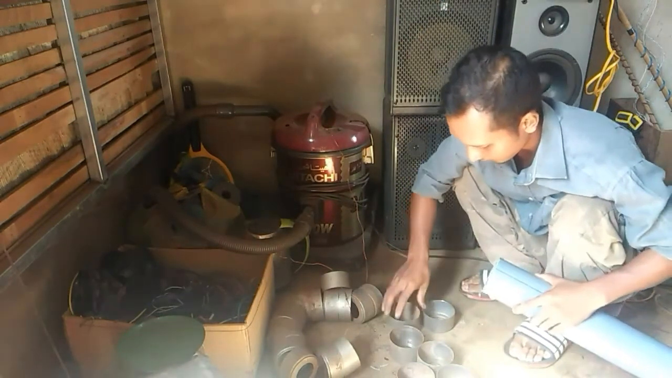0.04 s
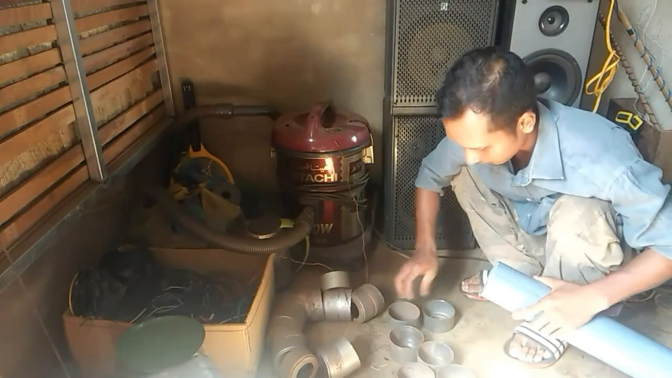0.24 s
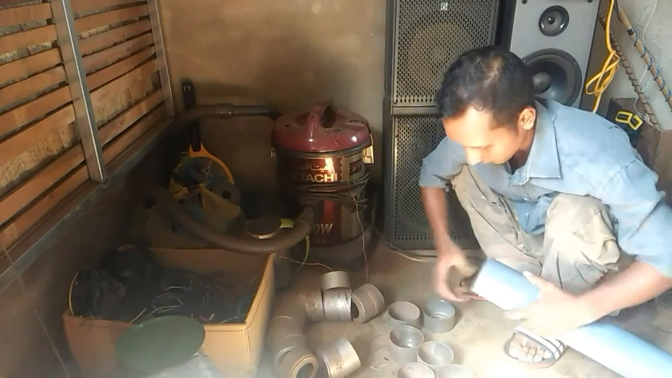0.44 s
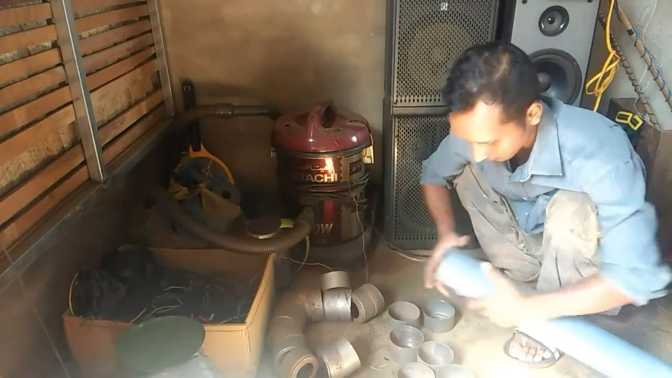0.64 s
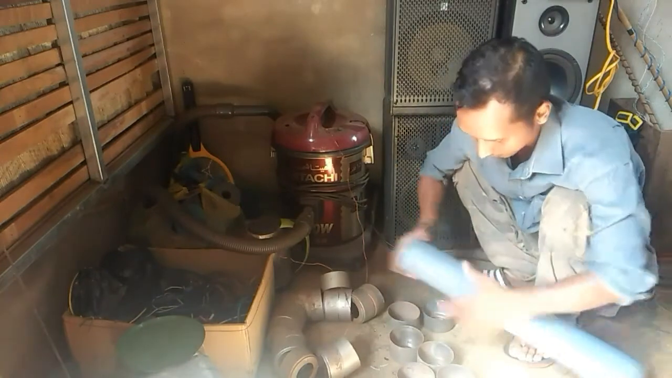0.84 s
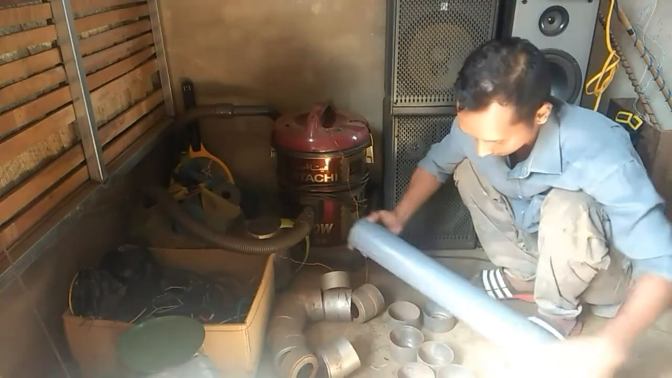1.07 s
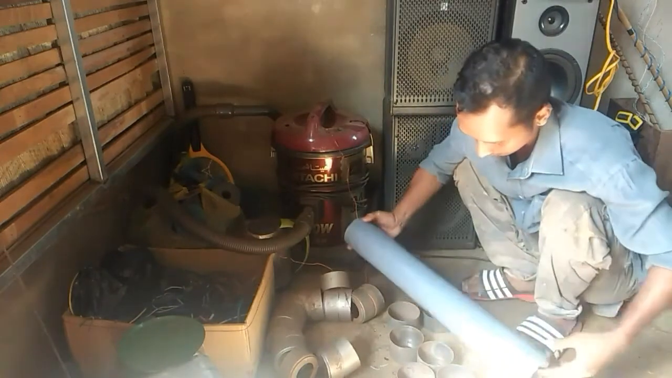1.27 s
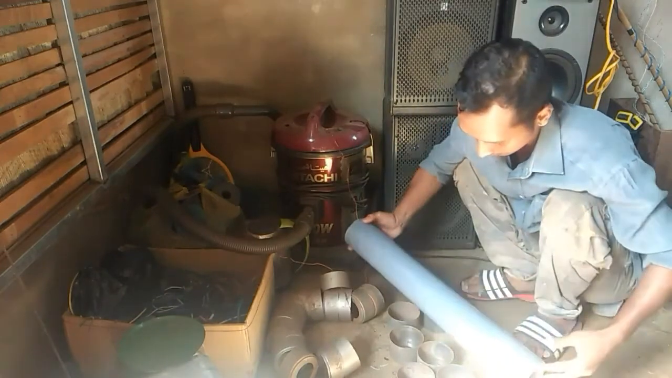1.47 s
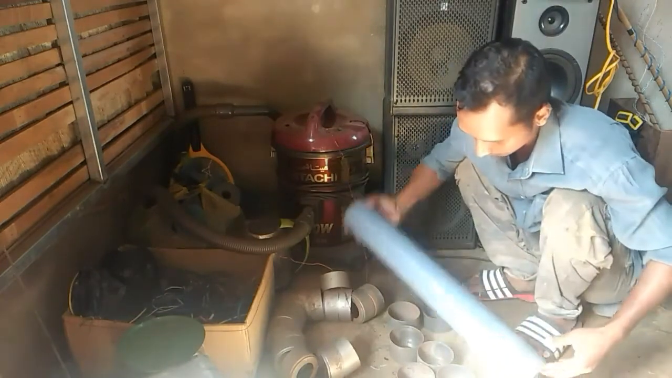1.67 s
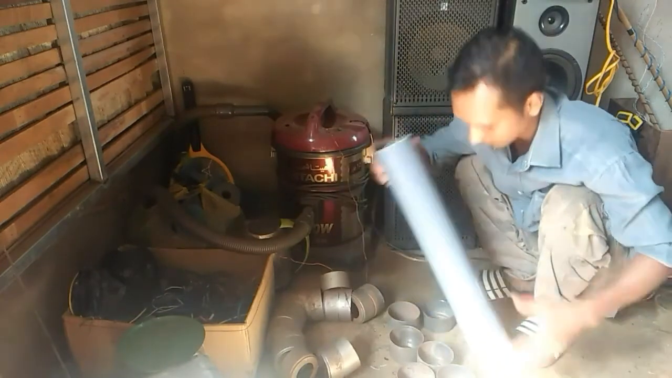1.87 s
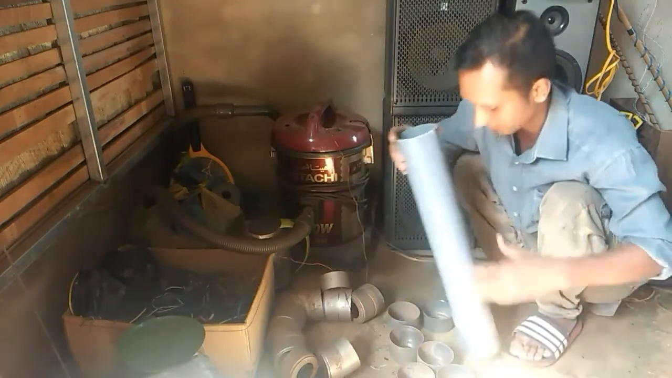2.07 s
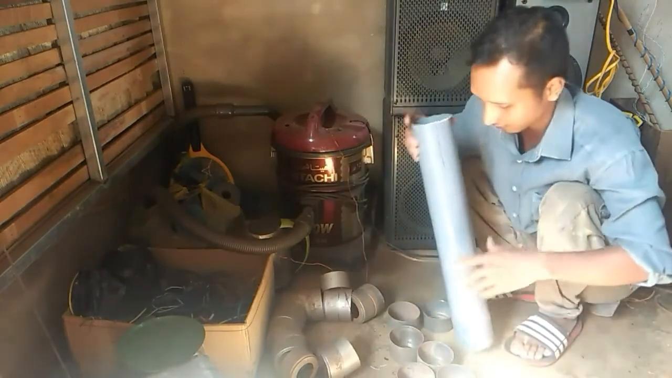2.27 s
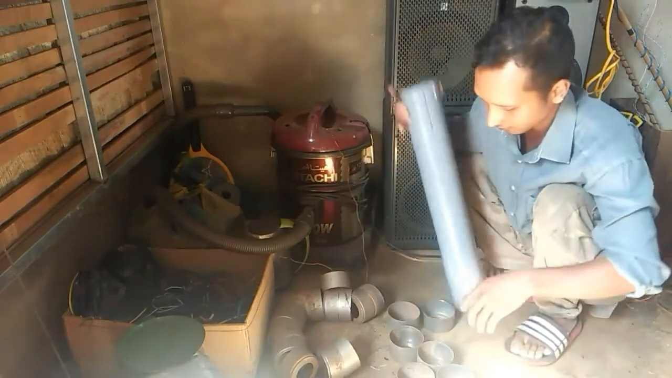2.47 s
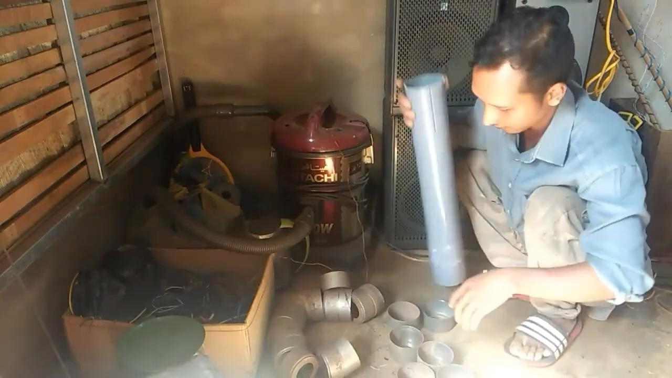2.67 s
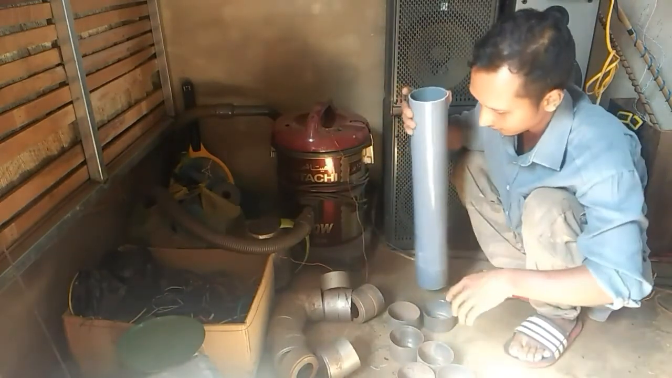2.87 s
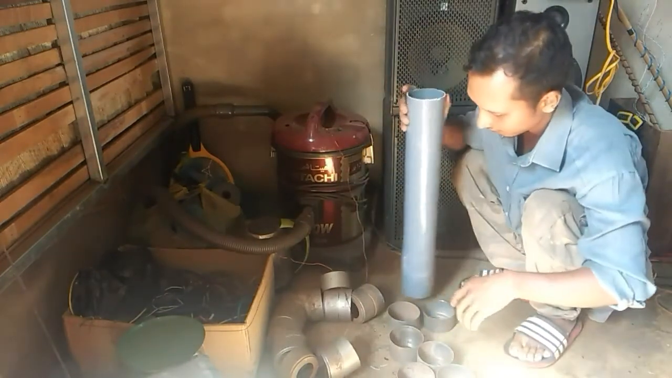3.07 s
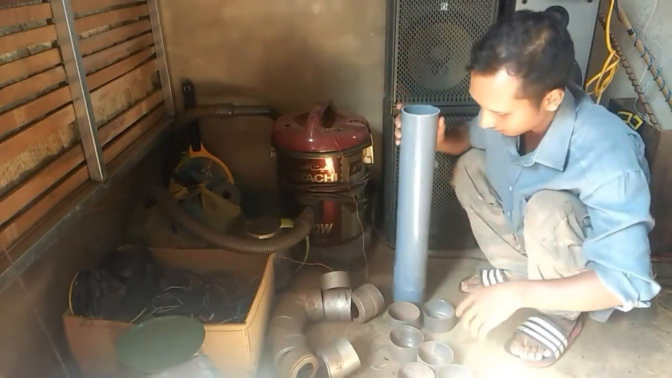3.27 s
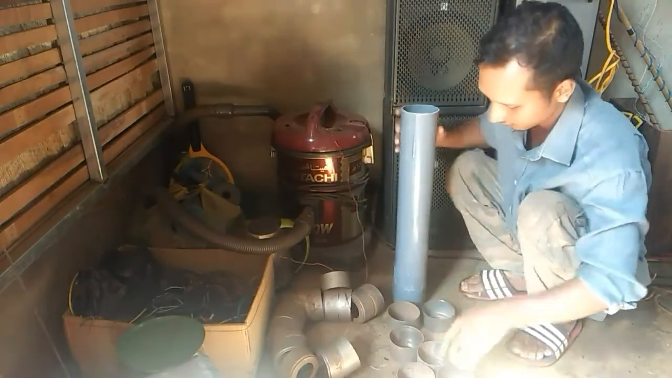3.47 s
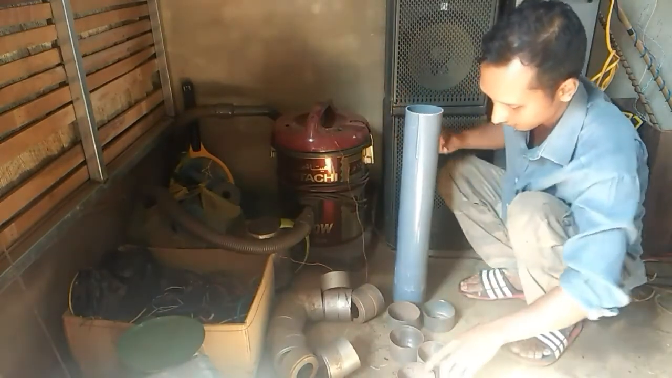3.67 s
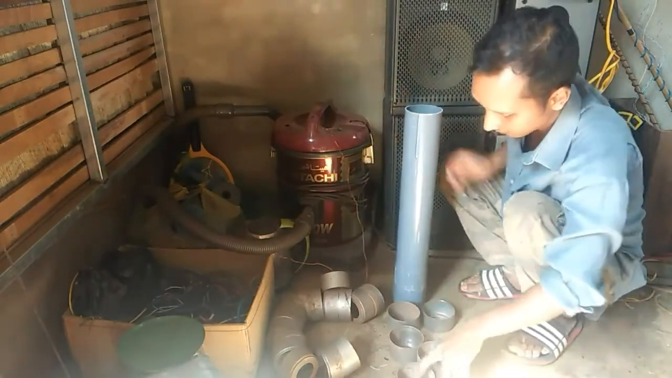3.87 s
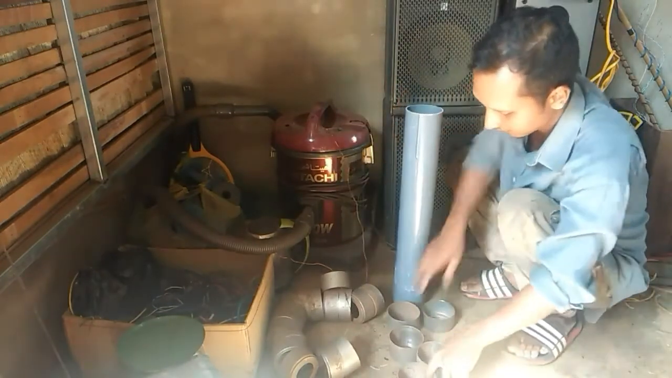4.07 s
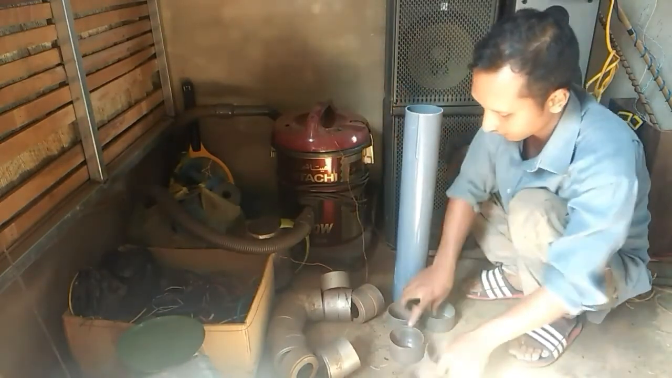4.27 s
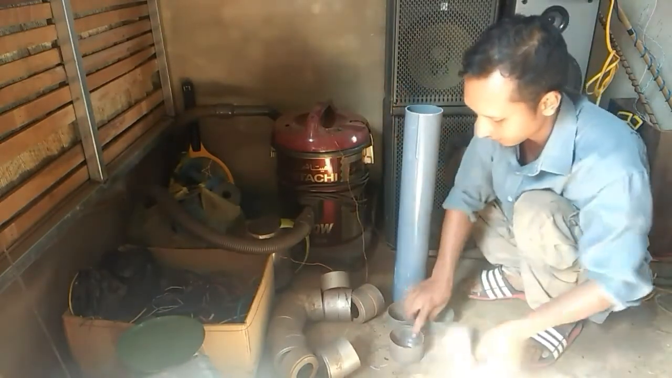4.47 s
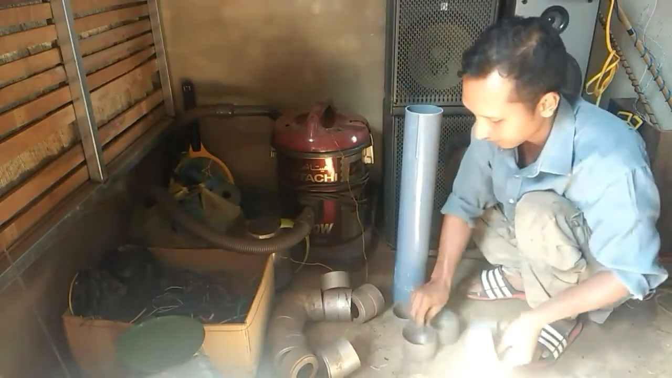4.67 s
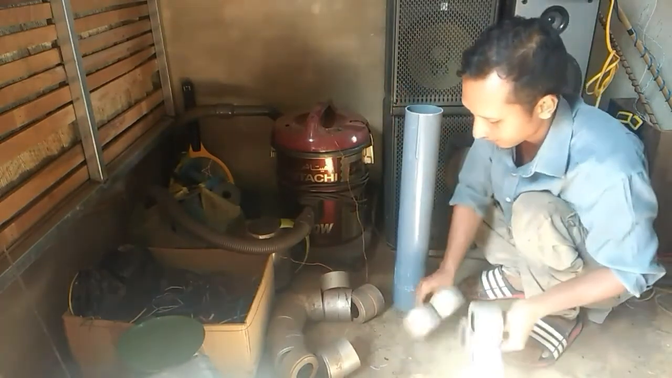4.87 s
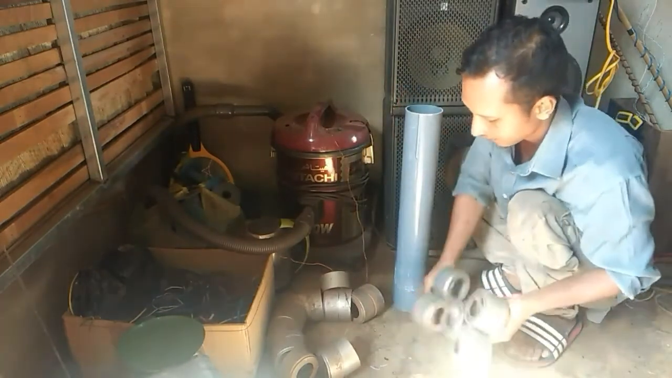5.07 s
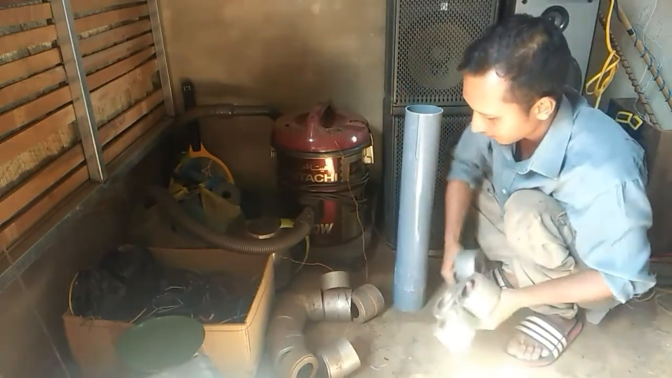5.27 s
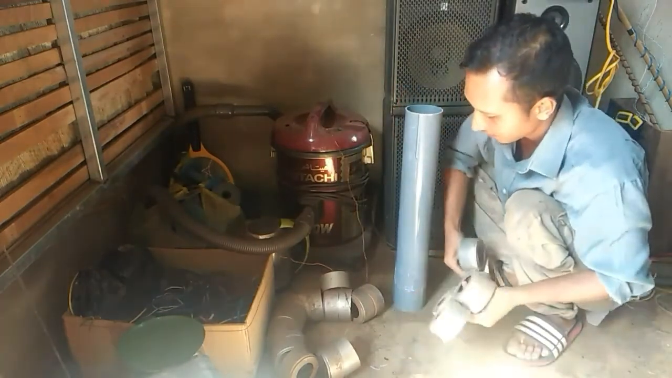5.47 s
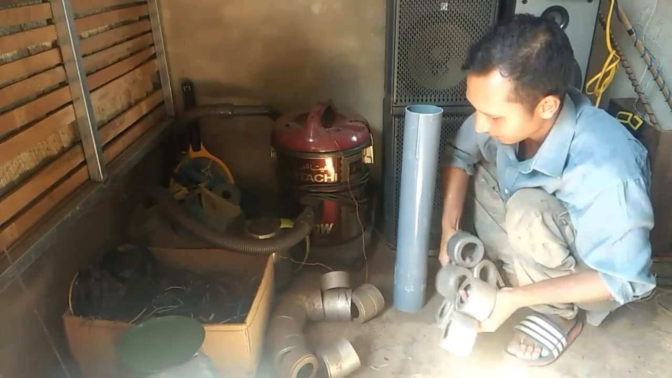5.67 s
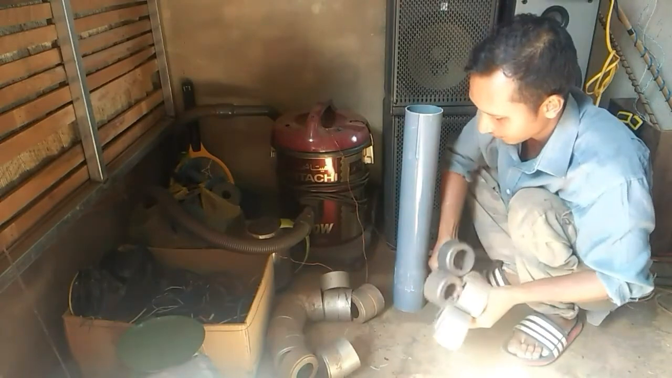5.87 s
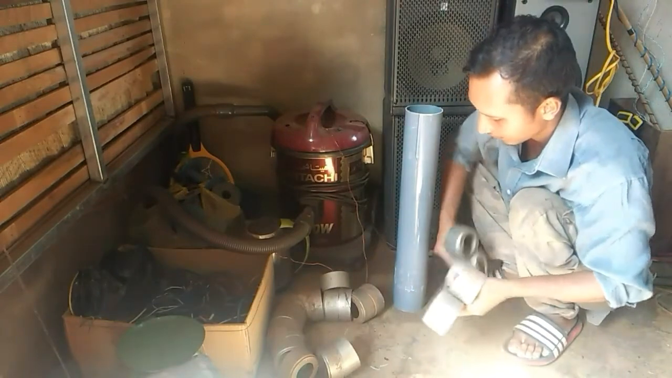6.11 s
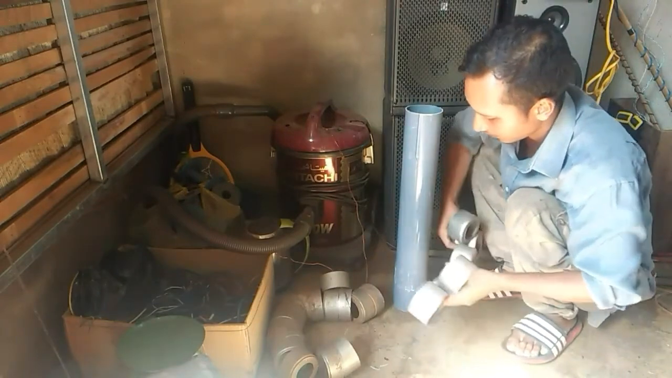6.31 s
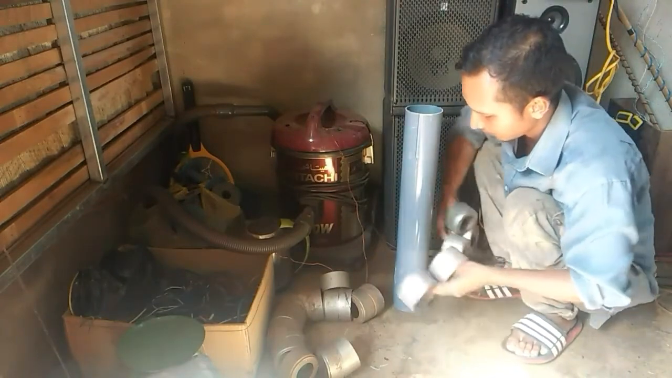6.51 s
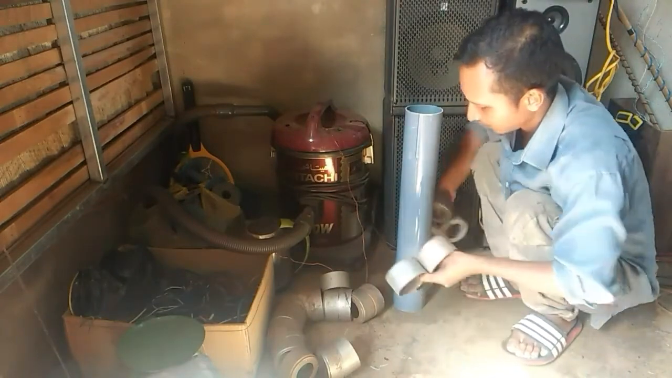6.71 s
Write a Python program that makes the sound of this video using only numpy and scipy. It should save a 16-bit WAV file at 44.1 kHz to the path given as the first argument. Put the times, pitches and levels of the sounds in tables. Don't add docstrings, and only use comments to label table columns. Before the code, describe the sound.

Small metal tube pieces clink and scrape in a plastic pipe, the pipe knocks hollowly on concrete, then the pieces clatter together in the hands.

```python
import sys
import numpy as np
from scipy import signal
from scipy.fft import rfft, irfft, next_fast_len
from scipy.io import wavfile
from scipy.ndimage import uniform_filter1d

SR = 44100
rng = np.random.default_rng(int(sys.argv[2]) if len(sys.argv) > 2 else 0)


def ratio_of_db(decibels):
    return 10 ** (np.asarray(decibels, float) / 20)


def int16_out(signal):
    q = np.round(np.clip(np.atleast_2d(signal).T, -1, 1) * 32767)
    wavfile.write(sys.argv[1], SR, q.astype(np.int16))


N = 297436

# start_s, level_db, hardness_db
PIPE_KNOCKS = [
    (3.289, -13.5, -17.5),
    (3.2965, -8.5, 2.5),
    (3.31, -21, -15.5),
    (3.332, -15.5, -4),
    (3.347, -14, -13.5),
    (3.51, -43, -21.5),
]


def rms_one(x):
    return x / np.sqrt(np.mean(x ** 2) + 1e-20)


def filtered(x, order, edge_hz, kind):
    return signal.sosfilt(signal.butter(order, edge_hz, kind, fs=SR, output="sos"), x)


def in_time(rows, outside=None):
    s, *columns = np.transpose(rows)
    return [np.interp(np.arange(N) / SR, s, c, outside, outside) for c in columns]


def coloured(x, spectrum):
    size = next_fast_len(len(x))
    hz, db = np.transpose(spectrum)
    bin_hz = np.maximum(np.fft.rfftfreq(size, 1 / SR), 1)
    bin_db = np.interp(np.log(bin_hz), np.log(hz), np.maximum(db, -80))
    cepstrum = irfft(np.log(ratio_of_db(bin_db)), size)
    cepstrum[1:size // 2] *= 2
    cepstrum[size // 2 + 1:] = 0
    response = np.exp(rfft(cepstrum))
    return rms_one(irfft(rfft(x, size) * response, size)[:len(x)])


def drift(rate_hz):
    knots = rng.standard_normal(2000)
    return np.interp(np.arange(N) / SR * rate_hz, np.arange(len(knots)), knots)


def grit(per_s, spread_db, smooth, size=N):
    heights = ratio_of_db(spread_db * np.minimum(rng.exponential(1, size), 4))
    signed = heights * rng.choice([-1, 1], size)
    contacts = signed * (rng.random(size) < per_s / SR)
    return rms_one(contacts) + smooth * rng.standard_normal(size)


def ring(drive, hz, t60_s):
    r = ratio_of_db(-60 / (max(t60_s, .01) * SR))
    w = 2 * np.pi * hz / SR
    return signal.lfilter([0, np.sin(w)], [1, -2 * r * np.cos(w), r * r], drive + 1e-18)


def strike(modes, times_s, levels_db, spread_db, chatter_s, chatter_db, flutter_db):
    at = np.round(np.array(times_s) * SR).astype(int)
    out = np.zeros(N)
    luck = rng.standard_normal((len(at), len(modes)))
    span = slice(at.min(), min(at.max() + SR // 2, N))
    fade = np.exp(-1 / (chatter_s * SR))
    rough = rms_one(grit(900, 3.5, 0.31, size=span.stop - span.start))
    contacts = ratio_of_db(chatter_db) * np.sqrt(1 - fade) * rough
    for k, (hz, db, t60_s) in enumerate(modes):
        clicks = np.zeros(len(contacts))
        clicks[at - at.min()] = ratio_of_db(levels_db + db + spread_db * luck[:, k])
        swell = signal.lfilter([2 * (1 - fade)], [1, -2 * fade, fade ** 2], clicks + 1e-18)
        drive = clicks + contacts * swell
        knots = ratio_of_db(flutter_db * rng.standard_normal(600))
        flutter = np.interp(np.arange(len(drive)) * 70.0 / SR, np.arange(600), knots)
        sound = ring(drive, hz, t60_s) * flutter
        energy = np.sum(clicks ** 2) * (1 + ratio_of_db(chatter_db) ** 2 / 2) * t60_s * SR / (4 * np.log(1000))
        out[span] += sound * np.sqrt(energy / np.sum(sound ** 2))
    return out


def glances(touches):
    out, size = np.zeros(N + SR), SR // 2
    t = np.arange(size) / SR
    for s, hz, db, t60_s in touches:
        chatter_env = t / .012 * np.exp(-t / min(.012, t60_s / 5)) * .05
        drive = grit(900, 2.7, .6, size=size) * chatter_env
        drive[0] = 1
        knots = ratio_of_db(3.5 * rng.standard_normal(size // 100))
        flutter = np.interp(t * 70, np.arange(size // 100), knots)
        sound = ring(drive, hz, t60_s) * flutter
        energy = .65 * max(t60_s, .01) * SR / (4 * np.log(1000))
        i = round(s * SR)
        out[i:i + size] += ratio_of_db(db) * sound * np.sqrt(energy / np.sum(sound ** 2))
    return out[:N]


def bursts(times_s, levels_db, t60s_s, rises_s):
    out = np.zeros(N)
    for s, db, t60_s, rise_s in np.broadcast(times_s, levels_db, t60s_s, rises_s):
        i = round(s * SR)
        t = np.arange(min(SR // 2, N - i)) / SR
        rise = 1 - np.exp(-t / max(rise_s, 1e-4))
        out[i:i + len(t)] += ratio_of_db(db - 60 * t / max(t60_s, .005)) * rise
    return out


def echo(x, t60_s, gap_s):
    t = np.arange(SR // 2) / SR
    tail = rng.standard_normal(len(t)) * ratio_of_db(-60 * t / t60_s) * (t > gap_s)
    return signal.fftconvolve(x, tail / np.sqrt(np.sum(tail ** 2)))[:N]


def streaky(x, t60_s):
    turn = 1.3 * drift(9)
    return rms_one(.5 * x + np.cos(turn) * echo(x, t60_s, 0) + np.sin(turn) * echo(x, t60_s, 0))


def swells():
    # start_s, length_s, deep_db, low_db
    rumble_swells = [
        (0.0, 0.15, -71, -64),
        (0.354, 1, -71, -61.5),
        (1.85, 0.17, -69, -67),
        (2.19, 2.5, -71.5, -76),
        (3.309, 3.7, -67.5, -69),
        (4.712, 0.19, -59, -63),
        (5.295, 0.13, -50.5, -52),
        (5.62, 0.28, -59.5, -62.5),
        (6.148, 0.53, -59.5, -82),
    ]
    edge_s, floor_db = 0.17, -81.5
    t, power = np.arange(N) / SR, ratio_of_db(2 * floor_db)
    for s, length_s, *levels_db in rumble_swells:
        shape = np.clip(np.minimum(t - s, s + length_s - t) / edge_s + .5, 0, 1) ** 2
        power = power + np.outer(ratio_of_db(2 * np.array(levels_db)), shape)
    return 10 * np.log10(power)


def rumble(levels_db):
    # from_hz, to_hz
    bands_hz = [(36, 55), (60, 110)]
    bands = [filtered(rng.standard_normal(N), 3, edges_hz, "band") for edges_hz in bands_hz]
    return sum(ratio_of_db(db + 2.0 * drift(15)) * rms_one(band) for db, band in zip(levels_db, bands))


def air_noise():
    # hz, db_per_hz
    air_spectrum = [(53, -24), (90, -1.5), (374, -22.5), (425, -11), (585, -16.5), (708, -8), (933, -11.5),
                    (1880, -22.5), (3140, -30.5), (14500, -36)]
    return ratio_of_db(-75 + 0.73 * drift(18)) * coloured(rng.standard_normal(N), air_spectrum)


def handling(scrape_db, rustle_db):
    # hz, width_hz, level_db
    pipe_rub = [(340, 78, -23), (747, 36, 23), (870, 4.6, 12), (1160, 30, -8), (1455, 53, 12),
                (1750, 11, 9), (1970, 3.5, 5), (2400, 600, 23.5)]
    # hz, level_db, t60_s
    hand_modes = [(8450, -4, .03), (8660, -1, .045), (8900, -3, .03), (9500, -6, .03), (9830, -2, .04),
                  (10200, -6, .03), (11100, -5, .03), (11400, -3, .035), (11800, -5, .03),
                  (13140, -7, .035), (13400, -8, .03), (13800, -11, .03)]
    # hz, level_db, t60_s
    held_modes = [(1800, -2, .05), (2450, -1, .05), (2885, 0, .08), (3190, 0, .08), (4260, -5, .1),
                  (5167, -6, .1), (5860, -8, .1), (6700, -5, .08), (7750, -2, .08)]
    # hz, db_per_hz
    scrape_spectrum = [(71, -55), (120, 1.5), (210, -10), (283, 0), (520, -3), (871, -1), (971, -3),
                       (1960, -4), (3300, -18), (4800, -19), (6500, -21.5), (11000, -120)]
    rustle_spectrum = [(1650, -29.5), (2800, -20.5), (3390, -24), (4350, -38.5), (5600, -17), (7340, -8.5),
                       (8710, -1), (11300, -9.5), (12500, -17.5), (13600, -5), (14500, 0.5)]

    rough = grit(2500, 2.8, .8)
    hollow = rms_one(sum(ratio_of_db(db + 4 * drift(9)) * rms_one(ring(rough, hz, 2.2 / width_hz))
                         for hz, width_hz, db in pipe_rub))
    in_pipe = np.arange(N) < 1.2 * SR
    scrape = streaky(coloured(rough, scrape_spectrum), .08) + .8 * in_pipe * hollow

    fine = grit(1200, 2.8, 0.82)
    jingle = rms_one(sum(ratio_of_db(db + 4.5 * drift(58)) * ring(fine, hz, 1.6 * t60_s)
                         for hz, db, t60_s in hand_modes))
    lower = rms_one(sum(ratio_of_db(db + 6 * drift(18)) * rms_one(ring(fine, hz, t60_s))
                        for hz, db, t60_s in held_modes))
    rustle = coloured(fine, rustle_spectrum) + ~in_pipe * (.45 * jingle + ratio_of_db(-16) * lower)
    scrape_gain = ratio_of_db(scrape_db - 1.5 + 2.5 * drift(30))
    rustle_gain = ratio_of_db(rustle_db - 1.5 + 3.5 * drift(35))
    return scrape_gain * scrape + rustle_gain * rustle


def offcuts():
    # start_s, crack_db, thud_db (above crack)
    first_clinks = [
        (0.0373, -23.5, -12),
        (0.0677, -22, -1),
        (0.088, -37, -1),
        (0.155, -39, -13),
        (4.512, -39.5, -5),
        (4.5326, -32.5, -26),
        (4.5594, -31.5, -17),
    ]
    slide_clinks = [(0.008, -38, 11.5), (0.17, -44, -30), (0.24, -46, -24), (0.31, -51, -32),
                    (0.395, -46.5, 8), (0.4294, -43, -3), (0.4678, -36, 13.5), (0.5179, -30, 4.5),
                    (0.5594, -43, 10), (0.7442, -38.5, 12.5), (0.817, -35, 6), (0.9078, -23, -28),
                    (0.989, -26, 3), (1.038, -23.5, -18), (1.8694, -55, 8.5), (2.2782, -41, 17.5),
                    (3.7124, -47, -2)]
    grab_clinks = [
        (3.873, -50, 14.5),
        (3.905, -46.5, -2),
        (3.943, -60.5, 32),
    ]
    lift_clinks = [
        (4.0796, -43.5, 8),
        (4.0991, -29, -23),
        (4.1194, -42, -37),
        (4.2018, -30.5, -5.5),
        (4.2133, -23, -6.5),
        (4.2294, -60, -19),
        (4.3779, -41.5, -6.5),
    ]
    stack_clinks = [
        (4.612, -22, -0.5),
        (4.6269, -18, -12),
        (4.643, -12.5, -8),
        (4.6573, -9, -29),
        (4.6894, -20.5, -10),
        (4.7421, -12.5, 0.5),
        (4.756, -15.5, -9),
    ]
    drop_clinks = [
        (4.785, -13.5, -12),
        (4.83, -26.5, -2),
    ]
    clear_clinks = [
        (5.6963, -52, 4),
        (5.7804, -31, -15),
        (5.8075, -41, -28),
    ]
    hand_clinks = [(1.9883, -54.5, -7), (4.484, -50, -16), (4.961, -30.5, -7.5), (5.0074, -27, -7),
                   (5.1274, -28.5, -9), (5.1706, -34, -24), (5.2185, -29, -60), (5.2709, -34, -45),
                   (5.3374, -35, -7), (5.3986, -37.5, -2.5), (5.4725, -29.5, -31), (5.546, -34.5, -21),
                   (5.9825, -27.5, -7.5), (6.0474, -27, -13), (6.2194, -55, 22), (6.299, -45, 3),
                   (6.4088, -42, -30), (6.5186, -49, -12), (6.57, -41.5, 8.5), (6.657, -37, 5),
                   (6.705, -30, -10), (6.718, -22.5, -8)]
    # hz, level_db, t60_s
    first_modes = [(3397, -14, .09), (4474, -7, .11), (5865, -18, .08), (6585, -3, .14), (7630, -12, .2),
                   (8700, -20, .1), (9685, -12, .12), (10140, -11, .2), (10590, -15, .15),
                   (11260, -18, .15), (12840, -22, .2)]
    slide_modes = [(7200, -12, .08), (7800, -8, .07), (8300, -9, .05), (9700, -9, .05), (11200, -13, .05),
                   (12500, -15, .05)]
    grab_modes = [(4270, -9, .4), (5930, -8, .26), (7990, -2, .35), (8760, -9, .25), (10620, -14, .2),
                  (11430, -12, .2), (13600, -4, .25)]
    lift_modes = [(4230, -17, .2), (5950, -18, .25), (6650, -8, .2), (7960, -8, .2), (8690, 1, .1),
                  (8560, 1, .08), (9660, 5, .055), (10300, 6, .045), (11600, 0, .07), (13500, 3, .07),
                  (13700, -6, .1)]
    stack_modes = [(4280, -14, 0.35), (5170, -25, 0.4), (5857, -21, .4), (6375, -12, 0.24),
                   (7400, -29, 0.17), (8549, -26, .18), (9173, -6, 0.12), (9680, -8, 0.24),
                   (10520, -4, 0.08), (11620, -9, 0.06), (11300, -3, 0.05), (12950, -30, .2)]
    drop_modes = [(2358, -22, .4), (2810, -25, .5), (3192, -20, .4), (4180, -14, .5), (5170, -18, .55),
                  (5860, -13, .35), (6385, -5, .2), (7904, 1, .17), (8400, -10, .25), (8576, -12, .25),
                  (9528, -9, .3), (9615, -8, .3), (11080, -16, .3), (13340, -10, .16)]
    clear_modes = [(4476, -3, .2), (4680, -14, .06), (5856, 0, .2), (6150, -6, .05), (7670, -12, .2),
                   (9800, -16, .1), (12297, 2, .18)]
    hand_modes = [(8450, -4, .03), (8660, -1, .045), (8900, -3, .03), (9500, -6, .03), (9830, -2, .04),
                  (10200, -6, .03), (11100, -5, .03), (11400, -3, .035), (11800, -5, .03),
                  (13140, -7, .035), (13400, -8, .03), (13800, -11, .03)]
    # start_s, hz, level_db, t60_s
    lone_rings = [(0.0, 8330, -45.5, 0.45), (0.0, 10960, -48, 0.2), (0.744, 877, -33, 0.06),
                  (0.817, 1753, -39, 0.073), (0.912, 1464, -49, 0.18), (0.99, 1410, -37, 0.1),
                  (1.038, 1720, -31.5, 0.036), (1.039, 5260, -37, 0.044), (1.061, 2830, -54, 0.16),
                  (3.97, 2230, -76, .3), (4.101, 2775, -40.5, 0.092), (4.105, 7970, -47, 0.14),
                  (4.657, 11300, -9, 0.032), (4.219, 2243, -39, 0.32), (4.217, 6675, -54, 0.17),
                  (4.282, 3160, -45, 0.15), (4.3, 8660, -36, 0.089), (4.328, 5930, -47, 0.3),
                  (4.37, 5230, -74, 0.19), (4.634, 1967, -36, 0.74), (4.635, 2934, -32, 0.093),
                  (4.647, 1317, -27, 0.12), (4.657, 4270, -31, 0.41), (4.661, 960, -34, 0.18),
                  (4.742, 780, -28.5, 0.14), (4.75, 3800, -35, 0.071), (4.657, 11600, -19, 0.039),
                  (4.874, 5110, -42, 0.25), (4.988, 2890, -48.5, 0.2), (5.096, 4385, -45, 0.22),
                  (5.125, 6630, -46, .2), (5.108, 5170, -50, 0.42), (5.113, 2906, -42.5, 0.059),
                  (5.235, 3210, -74, 0.23), (5.337, 3100, -53, 0.11), (5.33, 5930, -61, 0.33),
                  (5.462, 1735, -52, 0.14), (5.483, 7751, -70, .25), (5.489, 4320, -61, 0.28),
                  (5.492, 2860, -55.5, 0.53), (5.697, 6660, -53, 0.2), (5.881, 980, -48, 0.13),
                  (5.985, 6840, -45, 0.043), (5.991, 3120, -58, 0.45), (6.05, 5200, -53.5, 0.38),
                  (6.075, 3175, -42.5, 0.19), (6.265, 1910, -52, 0.16), (6.72, 3205, -33.5, 0.088),
                  (6.716, 4210, -48, 0.15), (6.722, 5730, -45, .15)]
    # start_s, peak_db
    edge_ticks = [(3.834, -71), (3.8728, -42), (4.044, -38.5), (4.0985, -45), (4.214, -16), (4.483, -38.5),
                  (4.6265, -27), (4.657, -19), (4.785, -19), (5.172, -32), (5.193, -38), (5.401, -43),
                  (5.492, -35), (5.533, -40), (5.552, -38), (5.7, -42), (5.73, -42), (5.755, -43),
                  (5.782, -30.5), (5.9883, -45), (6.409, -38), (6.521, -47), (6.72, -27)]
    # hz, db_per_hz
    crack_spectrum = [(1470, -46.5), (2500, -5.5), (2770, 0), (3260, -6.5), (4800, -4), (6220, -6.5),
                      (8600, -1), (11700, -6.5), (14500, 1)]
    thud_spectrum = [(71, -67), (120, -11), (316, -21), (400, -7), (580, -11.5), (678, -3.5), (898, 1),
                     (1450, -1), (3100, -19.5), (5500, -26.5), (11000, -120)]

    # clinks, modes, ring_db (against crack), crack_rise_s, crack_t60_s, chatter_s, chatter_db
    pieces = [(first_clinks, first_modes, -15, .008, .038, .012, 8),
              (slide_clinks, slide_modes, -24, .009, .18, .015, 8),
              (grab_clinks, grab_modes, -9, .002, .062, .012, 4),
              (lift_clinks, lift_modes, -19, .002, .33, .008, 3),
              (stack_clinks, stack_modes, -20, .003, .15, .006, 3),
              (drop_clinks, drop_modes, -14, .001, .26, .005, -3),
              (clear_clinks, clear_modes, -8, .006, .18, .008, 1),
              (hand_clinks, hand_modes, -23, .008, .26, .016, 12)]
    rings, contacts = np.zeros(N), []
    for clinks, modes, ring_db, rise_s, t60_s, chatter_s, chatter_db in pieces:
        s, crack_db, _ = np.transpose(clinks)
        rings += strike(modes, s, crack_db + ring_db, spread_db=5.5, chatter_s=chatter_s,
                        chatter_db=chatter_db, flutter_db=3.5)
        contacts += [(*clink, rise_s, t60_s) for clink in clinks]
    s, crack_db, thud_db, rise_s, t60_s = np.transpose(contacts)

    bright = streaky(coloured(grit(3000, 3.5, .6), crack_spectrum), .05)
    thin = filtered(bright, 4, 5500, "high")
    edge = rms_one(filtered(bright, 4, 7300, "high"))
    ticks = ratio_of_db(-4) * bursts(*np.transpose(edge_ticks), .04, 0.0002) * edge
    damped = np.abs(np.arange(N) / SR - 2.98) > 1.97
    cupped = np.where(damped, .45 * bright + .55 * thin, bright)
    crack = bursts(s, crack_db - 11, t60_s, rise_s) * cupped + ticks
    dull = streaky(coloured(grit(3000, 2.0, 0.39), thud_spectrum), 0.052)
    thud = bursts(s, crack_db + thud_db - 10, 1.106 * t60_s, 5.3 * rise_s) * dull
    return rings + glances(lone_rings) + crack + thud


def brief_rings():
    # start_s, hz, level_db, t60_s
    single_rings = [(0.068, 10140, -44, 0.14), (0.115, 12700, -55, 0.14), (0.07, 6585, -49, 0.22),
                    (4.213, 11950, -30, 0.037), (4.213, 9950, -33, .03), (4.228, 8440, -48, 0.13),
                    (4.252, 8700, -30, 0.089), (4.29, 4270, -51, .3), (4.41, 5945, -67, .3),
                    (4.485, 8730, -41, 0.049), (4.676, 9680, -38, .05), (4.689, 9175, -41, 0.051),
                    (4.755, 10300, -25, .04), (4.762, 7600, -34, 0.072), (4.766, 8600, -34, .05),
                    (4.785, 6375, -28.5, 0.13), (4.785, 9450, -22.5, 0.13), (4.784, 1800, -17.5, .02),
                    (4.784, 2400, -22.5, 0.019), (4.79, 1295, -37, 0.23), (4.81, 2100, -30.5, 0.083),
                    (4.83, 1750, -35, .08), (5.0, 3650, -51, 0.17), (5.792, 7660, -47, 0.41),
                    (5.80, 5852, -36.5, 0.33), (6.41, 10140, -42, 0.045), (6.41, 11700, -47, .04),
                    (6.5195, 11760, -37, 0.048), (6.5195, 9970, -38.5, 0.046), (6.66, 12000, -43, .05),
                    (6.722, 8630, -29, .1), (3.316, 619, -15, 0.32), (3.345, 628, -19.5, 0.12),
                    (3.3, 744, -15.5, 0.097), (3.333, 1455, -19, .14), (3.61, 710, -62, 0.58),
                    (3.66, 720, -68, 0.36), (4.785, 7800, -29.5, 0.087), (5.697, 5856, -52, .15),
                    (4.1, 9900, -37, 0.044), (6.715, 2270, -37, 0.073), (0.518, 280, -43, 0.17),
                    (0.745, 300, -47, 0.11), (2.285, 1300, -43, 0.11), (2.29, 402, -53.5, 0.22),
                    (4.222, 1175, -41, 0.084), (5.33, 170, -54, .3)]
    return glances(single_rings)


def shaped(note, attack, hold):
    s, length_s, first_hz, last_hz, db = note
    shares = np.array([0, attack, attack + hold, 1])
    return np.transpose([s + length_s * shares, first_hz + (last_hz - first_hz) * shares,
                         db + np.array([-20, 0, 0, -20])])


def tone(rows, overtones_db, flutter_db):
    hz = in_time(rows)[0]
    db = in_time(rows, outside=-200)[1]
    phase = 2 * np.pi * np.cumsum(hz * (1 + 0.0051 * drift(26.6))) / SR
    partials = sum(ratio_of_db(o + flutter_db * drift(30.02)) * np.sin((k + 1) * phase)
                   for k, o in enumerate([0, *overtones_db]))
    return np.sqrt(2) * ratio_of_db(db) * partials


def far_tones():
    # start_s, length_s, first_hz, last_hz, level_db
    hum_notes = [
        (0.156, 1.57, 719, 690.4, -63.5),
        (2.373, 0.88, 699, 694, -77.5),
    ]
    squeak_note = (.14, .3, 1215, 900, -67.5)
    ping_note = (1.868, .34, 1145, 1122, -66)
    whistle_note = (2.98, .28, 880, 880, -80)
    chirp_notes = [
        (1.33, .19, 2080, 2150, -79),
        (1.925, .11, 3210, 3210, -79),
        (1.865, .055, 1560, 1400, -70),
    ]

    hum = sum(tone(shaped(note, 0.012, 0.54), [-25], flutter_db=6) for note in hum_notes)
    chirps = sum(tone(shaped(note, .15, 0.065), [], flutter_db=4.5) for note in chirp_notes)
    chirps = chirps * (.3 + 1.5 * drift(260))
    squeak = tone(shaped(squeak_note, .08, .65), [2, -18, -17, -20], flutter_db=3)
    squeak = squeak * (.7 + 1.1 * drift(200))
    ping = tone(shaped(ping_note, .04, .15), [], flutter_db=1.5) * (1 + .4 * drift(120))
    whistle = tone(shaped(whistle_note, .15, .5), [1.5], flutter_db=3)
    return hum + chirps + squeak + ping + whistle


def pipe_knock():
    # hz, level_db, t60_s
    pipe_modes = [(219, -12, .5), (436, -40, .4), (599, -7, .2), (635, -1, .19), (690, -12, .2),
                  (735, -3, .2), (797, -11, .2), (853, -19, .2), (1012, -25, .2), (1452, -8, .22),
                  (1482, -12, .22), (1595, -21, .2), (2336, -20, .2), (2372, -13, .22)]
    # hz, db_per_hz
    wall_spectrum = [(88, -60.5), (200, -20), (300, -22.5), (535, -27.5), (635, -9.5), (685, -8.5),
                     (1140, -30.5), (1460, -15), (1740, -34), (2310, -25), (3710, -41), (14000, -55)]
    s, db, hard_db = np.transpose(PIPE_KNOCKS)
    rattle_env = bursts(s, db + hard_db - 15.0, 0.36, 0.00068)
    rattle = rattle_env * coloured(grit(3300, 4.5, 0.63), wall_spectrum)
    blow = np.zeros(N)
    blow[np.round(s * SR).astype(int)] = ratio_of_db(db + 2.3 * hard_db - 7.5)
    slap = ring(blow, 1470, 0.04) + ratio_of_db(-3) * ring(blow, 980, 0.04) + ratio_of_db(-4) * ring(blow, 2350, 0.05)
    modes = strike(pipe_modes, s, db - 13, spread_db=1.5, chatter_s=0.013, chatter_db=-5, flutter_db=1.5)
    soft = filtered(modes + slap, 3, [540, 3400], "band")
    return ratio_of_db(1.5) * soft + rattle


def floor_boom():
    # hz, db_per_hz
    slab_spectrum = [(50, -7.5), (100, -0.5), (150, -9), (220, -4), (300, -7), (400, -12.5), (720, -18),
                     (1100, -42)]
    envelope = bursts([PIPE_KNOCKS[1][0]], -45, t60s_s=1, rises_s=0.016)
    return envelope * streaky(coloured(rng.standard_normal(N), slab_spectrum), .15)


def scene():
    # start_s, scrape_db
    hand_effort = [(0.0, -61), (0.3, -69.5), (0.6, -48), (0.99, -52.5), (1.15, -66), (1.4, -82),
                   (3.2, -78.5), (3.47, -61.5), (3.88, -69.5), (4.26, -50), (4.38, -76.5), (4.6, -50),
                   (4.79, -54), (4.97, -57), (5.35, -58.5), (5.55, -61.5), (5.8, -59), (6.74, -54)]
    shed_t60_s, shed_db = 0.23, -4.5
    t = np.arange(N) / SR
    scrape_db, = in_time(hand_effort)
    rustle_base_db = np.where(t < 3.9, -69.5, -57.5)
    rustle_db = rustle_base_db + 1.1 * (scrape_db + 60)

    near = filtered(offcuts() + pipe_knock(), 3, 180, "high")
    far = rumble(swells()) + far_tones() + air_noise()
    rims = brief_rings()
    mid = near + ratio_of_db(shed_db) * echo(near, shed_t60_s, gap_s=0.0047) + handling(scrape_db, rustle_db) + far
    mid = mid + rims + ratio_of_db(shed_db - 20) * echo(rims, shed_t60_s, gap_s=0.013) + floor_boom()

    treble = signal.sosfilt(signal.cheby2(8, 60, 3900, "high", fs=SR, output="sos"), mid)
    wide_db = -10.0 + 10 * (np.abs(t - 3.5) < .22)
    side = (ratio_of_db(wide_db) * treble + ratio_of_db(-34.5) * far) * drift(140)
    return np.array([mid + side, mid - side])


def roll_off(x):
    return signal.sosfilt(signal.butter(12, 15390, fs=SR, output="sos"), x)


def record(dry):
    limit_db, release_db_per_s = -14, 161
    level_db = 10 * np.log10(uniform_filter1d(np.mean(dry ** 2, axis=0), size=200) + 1e-12)
    fall_db = release_db_per_s * np.arange(N) / SR
    held_db = np.maximum.accumulate(level_db + fall_db) - fall_db
    target = ratio_of_db(-.7 * np.maximum(held_db - limit_db, 0))
    gain = signal.lfilter([.02], [1, -.98], target - 1) + 1
    dipped = dry - .7 * signal.lfilter(*signal.iirpeak(4850, 16.0, fs=SR), dry)
    cut = signal.sosfilt(signal.cheby2(12, 42, 14500, fs=SR, output="sos"), dipped * gain)
    return roll_off(cut)


dry = scene()
out = record(dry)
int16_out(out)
```